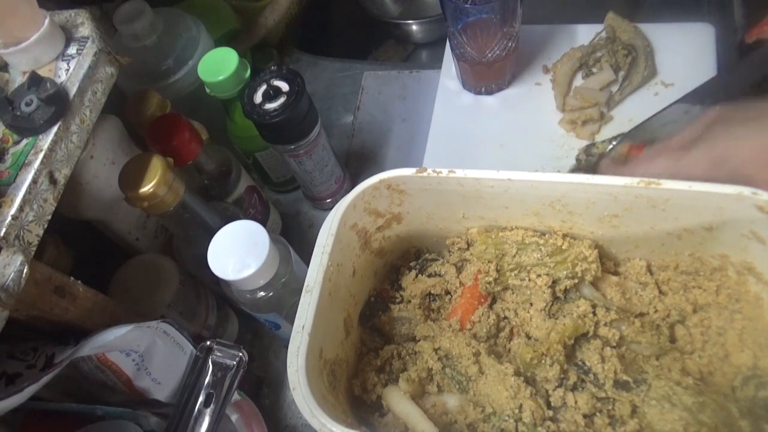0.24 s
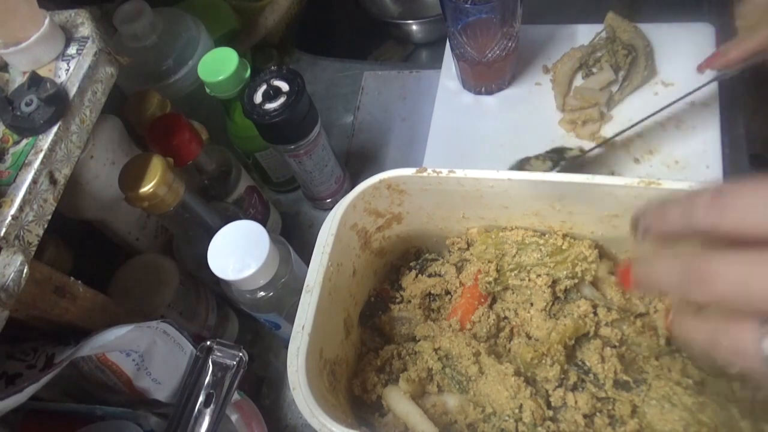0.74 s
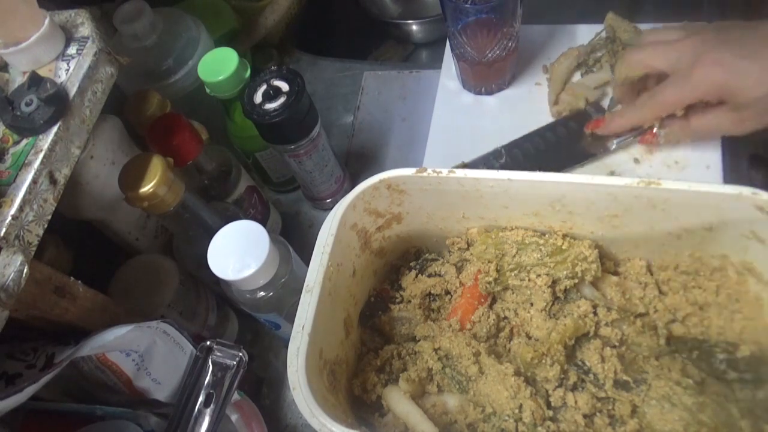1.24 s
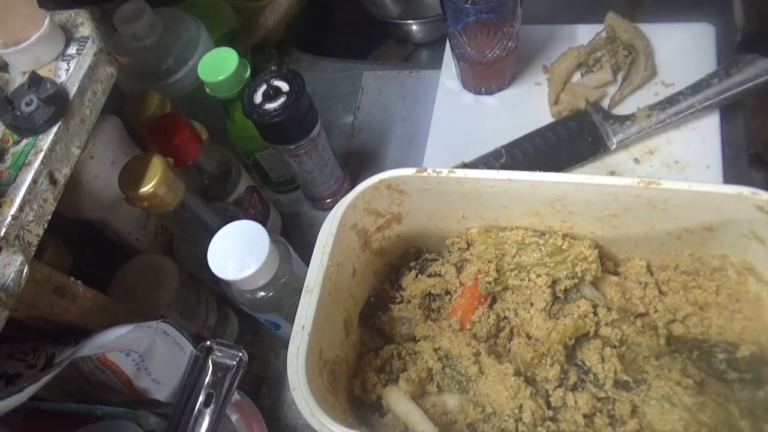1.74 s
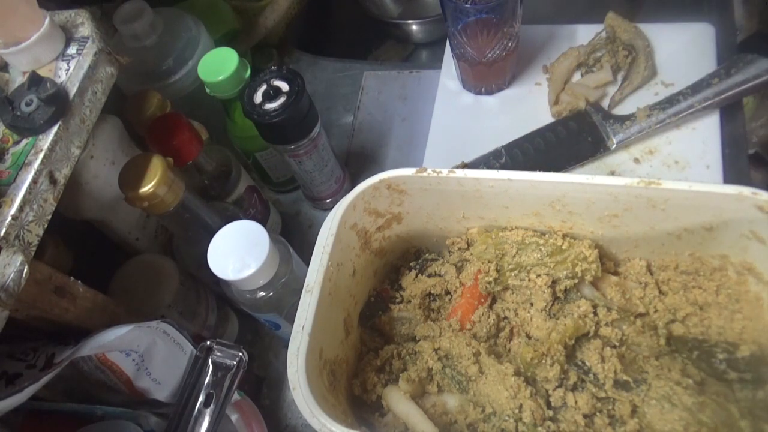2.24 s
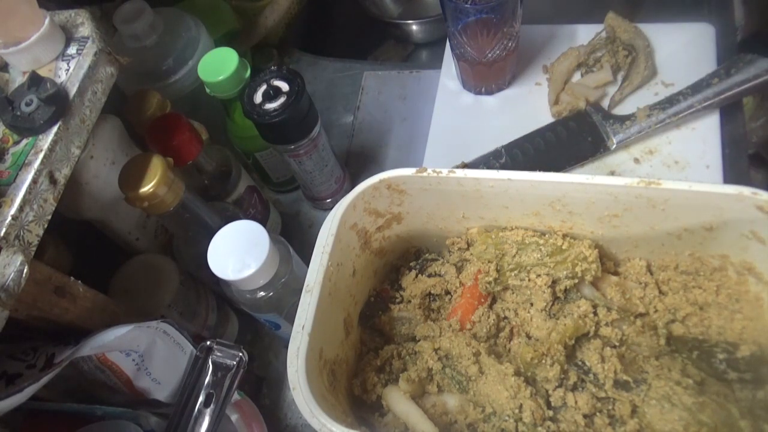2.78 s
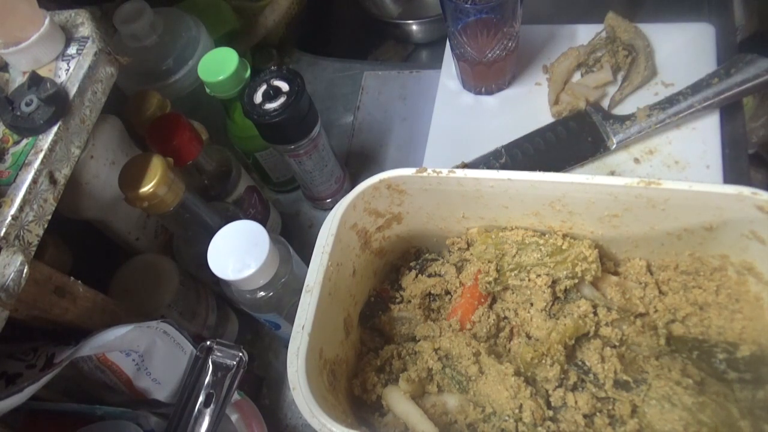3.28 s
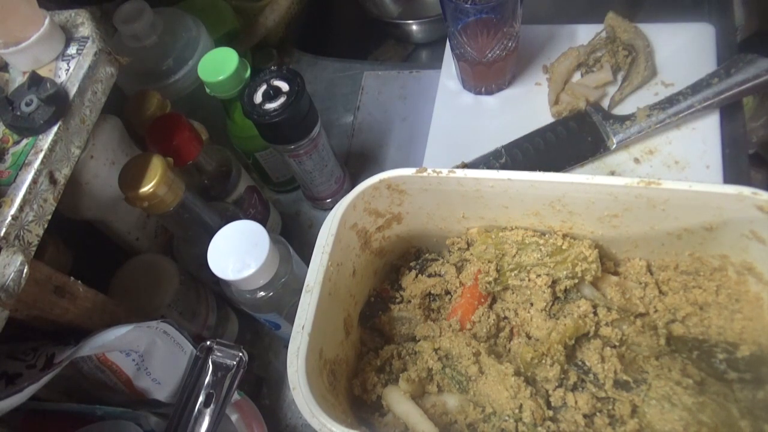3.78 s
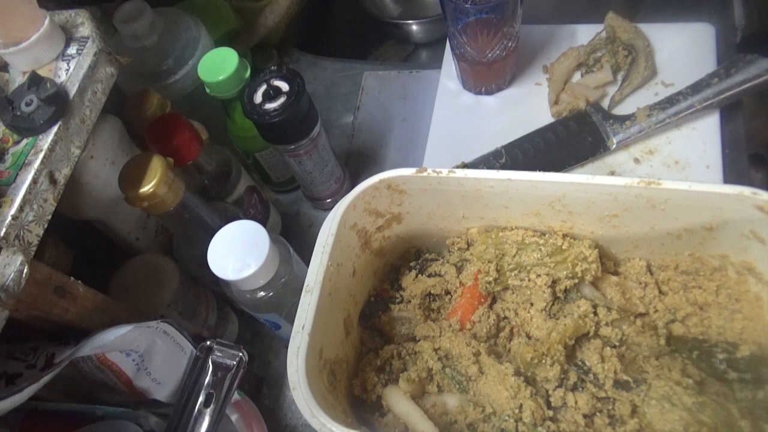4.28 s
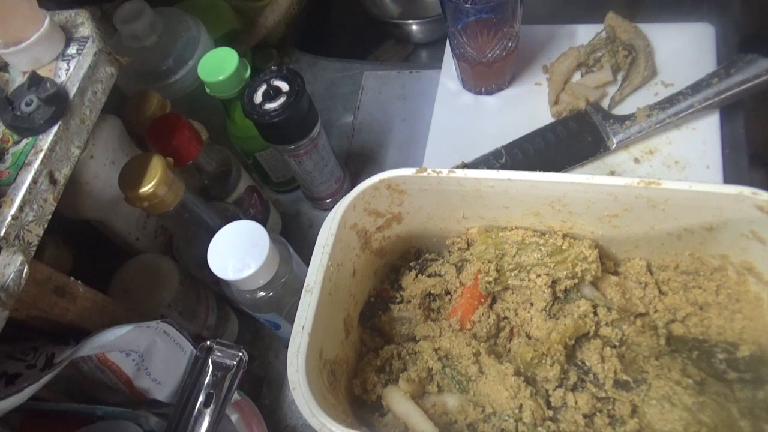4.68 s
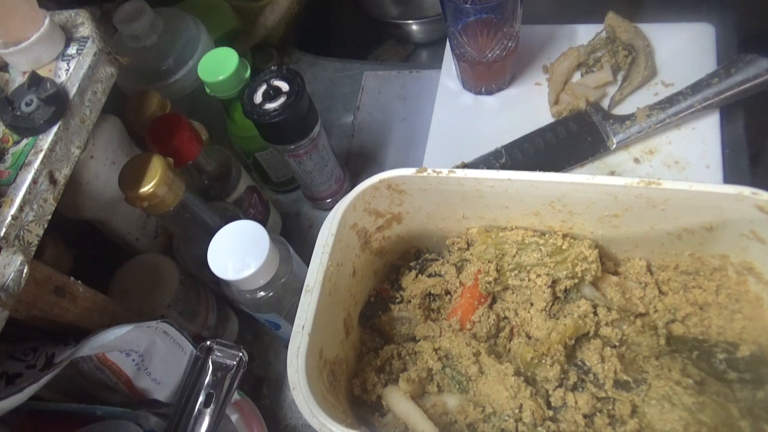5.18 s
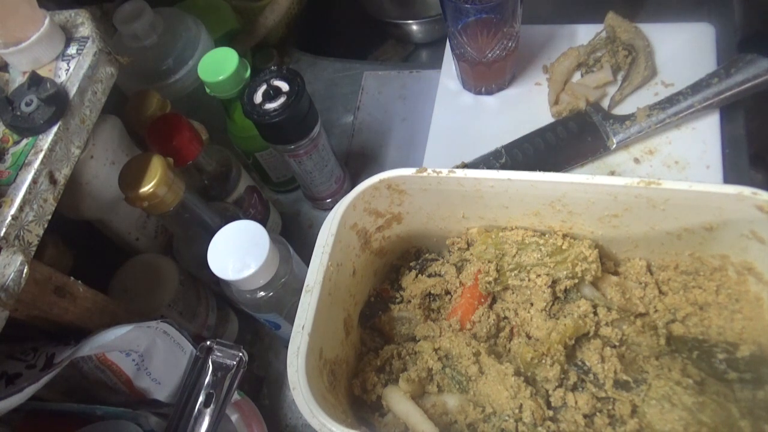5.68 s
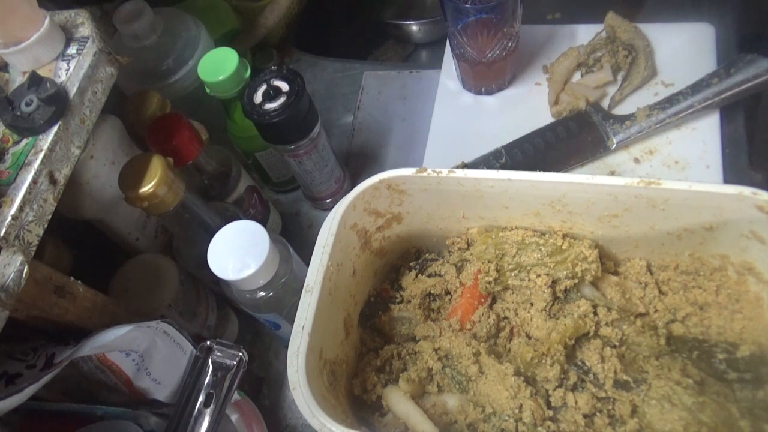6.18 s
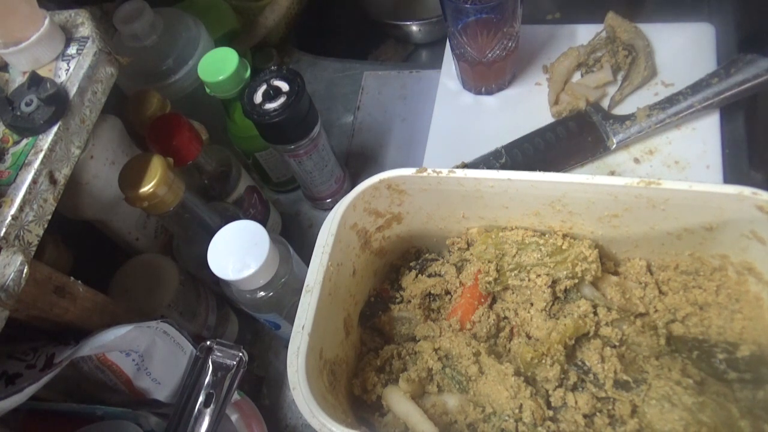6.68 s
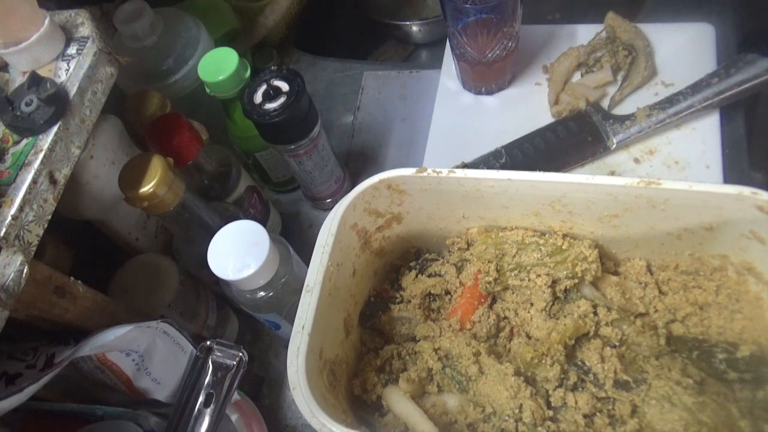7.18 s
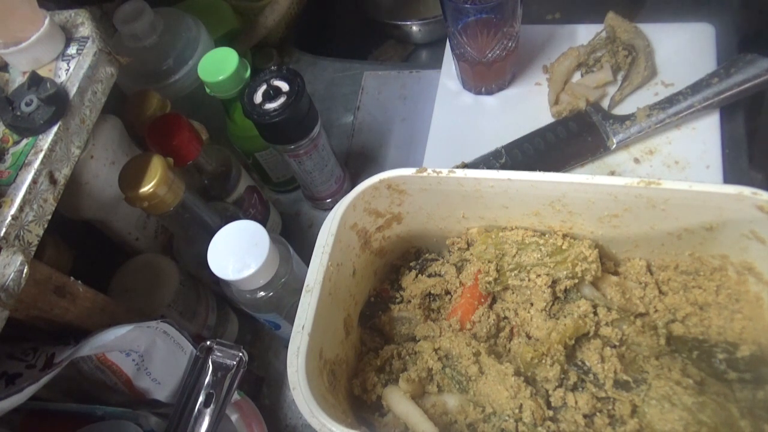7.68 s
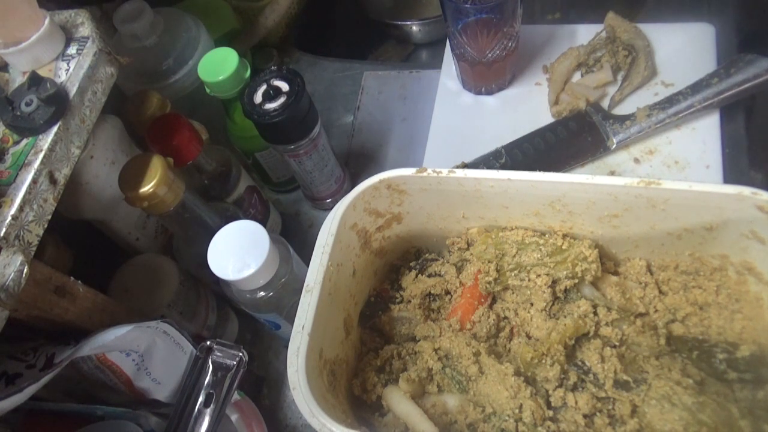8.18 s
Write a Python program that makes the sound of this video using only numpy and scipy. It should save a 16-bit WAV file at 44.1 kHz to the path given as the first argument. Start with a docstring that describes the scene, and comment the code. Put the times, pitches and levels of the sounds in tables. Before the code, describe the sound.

A low, soft room drone with faint hiss runs throughout. From 0 to 0.5 s a knife rubs and scratches gently on a plastic board; a faint knock comes at 0.64 s and a firmer one at 0.89 s. The blade slides with a thin metallic rasp and lands in a tight, hollow clack at 1.24 s, with a brief rattle by 1.3 s. Small rustles and dry ticks come around 1.8-2.2 s, then quiet. Crisp crackling returns from 3.1 s, peaks in a sharp rustle at 3.65 s and thins out to 4.5 s. At 4.9 s a tap erupts: rapid, harsh hissing spurts drum on the sink until 5.2 s, the loudest peaks flattened at the close microphone. Weaker spurts follow, with dull, sloshing bumps at 5.53-5.7 s. From there to 8.4 s a bright, broken spray splutters with quick high squirts, droplets and occasional bubble plips, growing slightly stronger at the end.

```python
"""A small kitchen with a low drone throughout: filtered noise rings a few soft room modes.
First a knife is laid on a plastic board, its blows and rubbing exciting board and blade modes, amid soft rustles of pops.
Then a tap opens with hard spurts: enveloped pops, coloured as hiss and splatter, drum on the sink and trail spray.
The stream builds up and splutters: squirts, droplets and bubbles are pops ringing pitched pockets of air,
with dull bumps on the sink. The close microphone clips the loudest peaks."""
import sys
import numpy as np
from scipy import signal
from scipy.fft import rfft, irfft
from scipy.io import wavfile

SR = 44100
rng = np.random.default_rng(int(sys.argv[2]) if len(sys.argv) > 2 else 0)


def wav_out(sig):
    """Save sig, one row per channel (or a flat mono array), as 16-bit PCM at SR to the path in sys.argv[1]."""
    wavfile.write(sys.argv[1], SR, np.round(np.clip(np.atleast_2d(sig).T, -1, 1) * 32767).astype(np.int16))


N = 371763
TIME = np.arange(N) / SR

# Levels in the tables are relative: each layer has its own gain on top.
# Low drone of the room. Each row: mode in Hz, level in dB, t60 in seconds.
DRONE_MODES = [(141.5, -0.5, 0.14), (232, -3, 0.14), (337.5, -5, 0.13), (693, -6, 0.064),
               (1685, -20.5, 0.035), (1927, -26, 0.049)]
# Spectrum of the room noise. Each row: frequency in Hz, density in dB per Hz.
ROOM_COLOUR = [(20, -38), (55, -18.5), (85, -6), (200, -12), (300, -13.5), (470, -11.5), (690, -11),
               (1000, -16.5), (1300, -24.5), (1650, -20.5), (2200, -24), (4200, -25), (6550, -16.5),
               (15500, -31.5)]
# Knife on the board. Each row: start in seconds, level in dB, click of the blade in dB over that level.
KNOCKS = [(0.639, -31.5, -7), (0.888, -23.5, -0.5), (1.2351, -21, 6.5), (1.240, -18, 4), (1.2448, -21, 5.5),
          (1.269, -34, -12)]
# Body of the board. Each row: mode in Hz, level in dB, t60 in seconds.
BOARD_MODES = [(153, -7, 0.3), (219, -1, 0.22), (267, 11.5, 0.16), (324, 11.5, .1), (367, -2, 0.14),
               (384, 8.5, 0.1), (463, -11, 0.46), (512, -2.5, 0.16), (620, 0, 0.076), (688, 0, 0.077),
               (752, 9, 0.066), (862, 3.5, 0.07), (960, 3, 0.05), (1040, -13, .05), (1590, -15, 0.086),
               (1680, -20, 0.05), (2000, -23, 0.044), (2420, -21, 0.076)]
# The blade slides over the board. Each row: time in seconds, level in dB.
SLIDE = [(.9, -80), (.94, -47), (1.02, -43), (1.08, -46), (1.13, -38), (1.2, -44), (1.235, -40),
         (1.26, -80)]
# Ringing of the blade. Each row: mode in Hz, level in dB, t60 in seconds.
BLADE_MODES = [(1610, -16, .1), (2245, -12, 0.086), (3984, -6, 0.053), (5717, -4, 0.037), (6255, 2, 0.044),
               (7000, -5, 0.017), (7400, -5, .012), (7940, -4, .025), (9458, 1, .03), (10266, -7, .025),
               (11600, -4, .025)]
# The knife rubs and rocks. Each row: peak time in seconds, level in dB, rise in seconds, fall in seconds.
RUBS = [(.06, -38.5, 0.31, 0.21), (.91, -39, .005, .08), (1.2, -39, 0.13, .03), (1.32, -33.5, 0.036, 0.025)]
# Spectrum of the blade's click. Each row: frequency in Hz, density in dB per Hz.
CLICK_COLOUR = [(50, -26), (250, 3), (800, 6.5), (1250, -10), (1700, -1), (3200, -12), (5000, -13.5),
                (7000, -6), (9000, -11), (15000, -26)]
# One rustle per movement. Each row: peak time in seconds, level in dB, rise in seconds, fall in seconds.
RUSTLES = [(.13, -31.5, 0.077, 0.054), (1.335, -32, 0.056, 0.027), (1.784, -26.5, 0.014, 0.02),
           (1.96, -39, 0.11, .06), (2.05, -30, 0.024, 0.031), (3.312, -25, 0.032, 0.09),
           (3.652, -12.5, 0.036, 0.038), (3.77, -21.5, 0.06, 0.053), (4.06, -36.5, 0.11, 0.11),
           (4.41, -36.5, 0.13, 0.16), (4.525, -28, 0.0077, 0.049), (4.87, -29.5, .012, 0.023)]
# Sharp crackles in the handling. Each row: start in seconds, level in dB, length in seconds.
CRACKLES = [(0.642, -35.5, 0.05), (1.772, -28, 0.016), (1.942, -26, 0.025), (2.039, -20, 0.014),
            (2.204, -32, 0.042), (3.147, -28, 0.023), (3.248, -26, .018), (3.436, -27, 0.019),
            (3.483, -16, 0.022), (3.515, -18.5, 0.017), (3.58, -20, 0.015), (3.83, -24, 0.016),
            (3.924, -25, 0.0078), (3.976, -23, 0.012), (4.106, -19.5, 0.012), (4.302, -26.5, 0.01),
            (4.502, -19.5, 0.018)]
# Spectrum of rustle and sliding. Each row: frequency in Hz, density in dB per Hz.
RUSTLE_COLOUR = [(200, -39), (330, 2), (600, -37), (1100, -17), (2200, -14), (3600, -10), (4700, -7.5),
                 (6400, 8), (7400, 5), (9000, -1.5), (13000, -3.5), (15800, -13.5)]
# Spurts, weaker towards the end as the air leaves the pipe. Each row: start in seconds, level in dB,
# length in seconds, low splatter in dB over that level, sink boom in dB over that level.
SPURTS = [(4.892, -13.5, 0.0098, -10, -4.5), (4.899, -8.5, 0.018, -33, -14),
          (4.918, -12, 0.042, -2.5, -7.5), (4.965, -31, 0.052, 2, 0), (5.019, -14, 0.01, -7, -13),
          (5.037, -7, 0.035, -15, -16.5), (5.069, -12.5, 0.03, -7.5, -12), (5.097, -5.5, 0.018, -18, -22),
          (5.132, -7, 0.025, -11, -23), (5.16, -21.5, 0.021, 0.5, -11), (5.181, -13, 0.024, -8, -11),
          (5.219, -15.5, 0.022, -20, -13), (5.378, -24.5, 0.051, -1, -20), (5.473, -21, 0.06, -10, -26),
          (5.557, -17, 0.077, -9.5, -26)]
# Spectra of spurts, spray and splatter. Each row: frequency in Hz, density in dB per Hz.
SPURT_COLOUR = [(1470, -44), (2500, -14.5), (3650, -12.5), (3940, -14), (4320, -7.5), (4820, -7), (6660, 0),
                (9000, -7), (12600, -9), (15800, -22)]
SPRAY_COLOUR = [(2000, -15.5), (3500, -11), (4500, -7), (5400, -6.5), (6300, 2.5), (7200, 0), (8800, -6.5),
                (11000, -3), (13000, -8.5), (15800, -17.5)]
SPLATTER_COLOUR = [(60, -84), (200, -3), (450, 2), (900, 2), (1400, 0.5), (2000, -1.5), (3000, 0.5),
                   (4500, -6.5), (7000, -3)]
# Body of the sink. Each row: mode in Hz, level in dB, t60 in seconds.
SINK_MODES = [(99, -6, 0.13), (145, -13, .12), (220, -14, 0.12), (261, 10, 0.11), (315.5, -1.5, 0.3),
              (363, -4.5, 0.11), (406, 1, 0.15), (510, -19, 0.04), (595, -33, 0.056), (708, -10.5, 0.13),
              (860, -27, 0.11), (1010, -23, 0.037)]
# Steady running. Each row: time in seconds, spray level in dB, splatter in the basin in dB.
FLOW = [(5.25, -21, -37), (5.43, -22.5, -32.5), (5.57, -32, -35.5), (5.82, -24.5, -40.5),
        (5.96, -23.5, -40.5), (6.23, -26, -38), (6.35, -25.5, -40), (6.59, -24, -41.5), (7.03, -23, -38),
        (7.19, -23, -38.5), (7.49, -26, -40), (7.74, -25.5, -42), (8.25, -19.5, -39), (8.43, -19.5, -37)]
# The loudest squirts. Each row: start in seconds, level in dB, nominal pitch in Hz (tuned up a little
# when played), width in Hz, length in seconds.
SQUIRTS = [(5.272, -15, 7840, 1300, 0.014), (5.315, -10, 8160, 6100, 0.012),
           (5.374, -15.5, 7600, 2470, 0.019), (5.799, -17, 9250, 6700, .018),
           (5.851, -9, 8350, 5300, 0.0081), (5.927, -20, 7600, 3800, .014),
           (5.975, -12.5, 7500, 1790, 0.023), (6.14, -18.5, 8050, 4600, .022),
           (6.209, -12.5, 10100, 3200, .011), (6.231, -16.5, 6100, 1640, 0.015),
           (6.264, -17.5, 6900, 2410, 0.019), (6.34, -14, 5750, 3360, 0.0088),
           (6.373, -13, 9200, 4700, 0.012), (6.521, -24, 8340, 6300, 0.0077),
           (6.596, -18, 8800, 4400, .021), (6.67, -17, 8200, 5400, 0.023),
           (6.783, -12.5, 7150, 2600, 0.006), (6.803, -21.5, 6800, 2000, 0.037),
           (6.947, -9.5, 9000, 2100, 0.011), (6.974, -10, 7230, 1600, 0.019),
           (7.156, -18.5, 6700, 1400, 0.044), (7.203, -16.5, 6940, 1500, 0.025),
           (7.221, -12, 5300, 3860, .013), (7.379, -20.5, 10300, 5100, 0.031),
           (7.496, -19, 7760, 6300, 0.023), (7.536, -12, 5500, 2006, 0.011),
           (7.729, -18.5, 6000, 2890, 0.02), (7.751, -8.5, 7100, 1900, 0.015),
           (7.895, -15, 8600, 4500, 0.0074), (7.949, -15.5, 9900, 6350, 0.017),
           (7.974, -14, 6470, 2400, 0.012), (8.047, -15.5, 8900, 5650, 0.029),
           (8.25, -10.5, 9900, 3500, 0.011), (8.32, -12.5, 8500, 3100, 0.011),
           (8.345, -24.5, 6930, 2200, 0.051), (8.408, -18, 7140, 3400, 0.02)]
# Dull bumps against the sink. Each row: start in seconds, level in dB, pitch of the slosh in Hz.
BUMPS = [(5.534, -26.5, 200), (5.583, -22, 220), (5.603, -28, 350), (5.63, -22, 131), (5.64, -19, 223),
         (5.651, -20.5, 110), (5.671, -15.5, 151), (5.699, -20.5, 380), (6.233, -19.5, 520)]
# The loudest bubbles. Each row: start in seconds, level in dB, pitch in Hz.
BUBBLES = [(5.572, -22.5, 3180), (5.587, -22, 3200), (6.919, -22.5, 2340), (6.921, -30.5, 1410),
           (7.025, -28.5, 1730), (7.179, -23.5, 2390), (7.19, -19.5, 2930), (7.75, -17.5, 4800),
           (7.84, -20.5, 4800), (8.105, -20, 4820), (8.154, -21, 4320), (8.27, -22, 2800)]

ROOM_DB, DRONE_DB = -43, -44
SCRAPE_DB, SCRAPE_HZ, SCRAPE_WIDTH_HZ = -8, 2030, 3500  # the edge scratches the board in the first rub
MIST_DB, MIST_S = -4.5, 0.034  # spray that trails each spurt: its share and its decay
OPEN_S, FILL_S = 5.05, 0.31  # the stream sets in after the first spurts; time for it to build up
BREAKUP_DB, BREAKUP_HZ = 2, 30.23  # the stream necks and swells, so its spray comes in clumps
# weaker squirts: typical gap, level over the spray, and random spread of the level
SPUTTER_GAP_S, SPUTTER_DB, SPUTTER_SCATTER_DB = .04, 1, 0.7
# their typical nominal pitch, its spread, and typical width and length
SPUTTER_HZ, SPUTTER_OCTAVES, SPUTTER_WIDTH_HZ, SPUTTER_S = 7220, 0.2, 3300, .012
CLEAR_S = .03  # no weak squirt falls this close to a loud one
# small bubbles form once water has pooled: earliest time, middle level, pitch range
POOL_S, SMALL_BUBBLE_DB, SMALL_BUBBLE_HZ = 6.3, -31.5, (1980, 4700)
KITCHEN_T60_S, KITCHEN_DB = 0.18, -10
TOP_HZ = 15900


def undb(db):
    """Decibels to gain."""
    return 10 ** (np.asarray(db) / 20)


def unit(x):
    """Scale to rms 1."""
    return x / np.sqrt(np.mean(x ** 2) + 1e-18)


def highpass(x, order, hz):
    """Thin out the sound below a frequency."""
    return signal.sosfilt(signal.butter(order, hz, "high", fs=SR, output="sos"), x)


def curve(rows):
    """Gain from dB over time; silent outside the table."""
    seconds, db = np.transpose(rows)
    return undb(np.interp(TIME, seconds, db, left=-np.inf, right=-np.inf))


def swells(rows):
    """Gain of movements that each grow to a peak and die away; their powers add."""
    power = np.zeros(N)
    for s, db, rise, fall in rows:
        distance = np.maximum((s - TIME) / rise, (TIME - s) / fall)
        power += (undb(db) * np.exp(-distance)) ** 2
    return np.sqrt(power)


def burst(length, attack=0.00048, steep=1.4, size=5000):
    """Envelope that opens fast, holds for about its length and collapses."""
    t = TIME[:size]
    return (1 - np.exp(-t / attack)) * np.exp(-(t / max(length, .002)) ** steep)


def walk(rate):
    """Slow chance with a spread near 1."""
    return np.interp(TIME * rate, np.arange(N // 100), rng.standard_normal(N // 100))


def patter(rate, spread_db, size=N):
    """Tiny impacts at random times (rate per second), most weak and a few strong; rms 1."""
    chance, strength, sign = rng.random(size), rng.exponential(size=size), rng.standard_normal(size)
    hits = chance < rate / SR
    return unit(hits * np.sign(sign) * undb(spread_db * np.minimum(strength, 4)))


def add(track, s, sound):
    """Mix a sound in at a time."""
    i = max(int(s * SR), 0)
    track[i:i + len(sound)] += sound[:max(N - i, 0)]


def ring(x, response):
    """Pass a sound through an impulse response."""
    return signal.fftconvolve(x, response)[:len(x)]


def colour(points, size=1024):
    """Causal minimum-phase response of unit energy with the given spectrum."""
    hz, db = np.transpose(points)
    bins_hz = np.arange(size // 2 + 1) * SR / size
    log_gain = np.log(undb(np.interp(np.log(bins_hz + 1), np.log(hz), db)))
    # folding the cepstrum forward in time makes the response causal
    cepstrum = irfft(log_gain)
    cepstrum[1:size // 2] *= 2
    cepstrum[size // 2 + 1:] = 0
    return unit(irfft(np.exp(rfft(cepstrum)))) / np.sqrt(size)


def modes(table):
    """Response of unit energy of a body with decaying modes; neighbours swing in opposite phase."""
    t = TIME[:SR // 2]
    response = np.zeros(len(t))
    for k, (hz, db, t60) in enumerate(table):
        decay = np.exp(-np.log(1000) * t / t60)
        response += (-1) ** k * undb(db) * np.sin(2 * np.pi * hz * t) * decay
    # a small body radiates almost nothing below its lowest mode
    response = highpass(response, 3, 0.55 * table[0][0])
    return response / np.linalg.norm(response)


def pocket(pops, hz, width, glide=0):
    """Pops ring a pocket of air whose pitch glides (share per s) as it changes size; their energy is kept."""
    t = TIME[:len(pops)]
    turn = np.exp(2j * np.pi * np.cumsum(hz * np.exp(glide * t)) / SR)
    pole = np.exp(-np.pi * width / SR)
    # resonate around zero frequency, then shift up to the gliding pitch
    out = (turn * signal.lfilter([1], [1, -2 * pole, pole ** 2], pops / turn)).real
    return out * np.linalg.norm(pops) / (np.linalg.norm(out) + 1e-12)


def background():
    """Room noise, barely wavering, with a low drone of noise through resonant modes and a thin hiss."""
    noise = ring(rng.standard_normal(N), colour(ROOM_COLOUR, size=8192))
    drone = ring(rng.standard_normal(N), modes(DRONE_MODES))
    return undb(.5 * walk(5.18)) * (undb(ROOM_DB) * noise + undb(DRONE_DB) * drone)


def knife():
    """Blows and friction ring the board; the sliding blade sings faintly and the handle rattles last."""
    blows, clicks = np.zeros((2, N))
    for s, db, click_db in KNOCKS:
        add(blows, s, undb([db]))
        click = burst(0.0064, attack=0.00036, steep=0.73) * patter(8100, 5.4, size=5000)
        add(clicks, s, undb(db + click_db) * click)
    knocks = undb(29.5) * ring(blows, modes(BOARD_MODES)) + ring(clicks, colour(CLICK_COLOUR))

    friction = patter(4000, 3)
    # the changing pressure of the fingers bends the blade's pitch
    bend = np.cumsum(.012 * walk(14)) / SR
    song = np.interp(TIME + bend, TIME, ring(friction, modes(BLADE_MODES)))
    rasp = ring(friction, colour(RUSTLE_COLOUR))
    slide = curve(SLIDE) * (undb(-0.5 + 2 * walk(45.1)) * song + rasp) / np.sqrt(2)

    rocking = swells(RUBS) * ring(patter(2000, 1.5), modes(BOARD_MODES[2:]))
    rattle = undb(1.5) * swells(RUBS[-1:]) * pocket(patter(1500, 2), 480, 170)
    scrape = undb(SCRAPE_DB) * swells(RUBS[:1]) * pocket(friction, SCRAPE_HZ, SCRAPE_WIDTH_HZ)
    return knocks + slide + rocking + rattle + scrape


def handling():
    """Dense tiny pops under fluttering swells make fine rustling; short bursts add sharper crackles."""
    flutter = undb(2.2 * np.minimum(walk(60), 1.2))
    envelope = undb(-0.5) * swells(RUSTLES) * flutter
    for s, db, length in CRACKLES:
        add(envelope, s, undb(db - 5.5) * burst(length))
    return ring(envelope * patter(12000, 2.8), colour(RUSTLE_COLOUR))


def spurts():
    """Air in the pipe throws the first water out in slugs that splatter, drum on the sink and trail spray."""
    hiss, splatter, boom, mist = np.zeros((4, N))
    for s, db, length, splatter_db, boom_db in SPURTS:
        slug = undb(db) * burst(length, attack=0.0015, steep=6.3)
        add(hiss, s, slug)
        add(splatter, s, slug * undb(splatter_db))
        add(boom, s, slug * undb(boom_db))
        add(mist, s, undb(db + MIST_DB) * burst(MIST_S, attack=0.0031, steep=1.4))
    jet = ring(hiss * undb(2 * walk(400)) * patter(7000, 1.7), colour(SPURT_COLOUR))
    splash = ring(splatter * patter(5400, 2.7), colour(SPLATTER_COLOUR))
    drum = ring(boom * patter(3000, 1.6), modes(SINK_MODES[2:]))
    spray = ring(mist * patter(6000, 1.8), colour(SPRAY_COLOUR))
    drips = undb(-9) * ring(mist * patter(2600, 1.9), colour(SPLATTER_COLOUR))
    return jet + splash + drum + spray + drips


def flow(axis):
    """Gain of the stream: it builds up when the tap opens, then follows a column of the flow."""
    rows = np.array(FLOW)
    build_up = np.clip((TIME - OPEN_S) / FILL_S, 0, 1)
    return build_up * undb(np.interp(TIME, rows[:, 0], rows[:, axis]))


def droplets(low_hz, high_hz, spread_db, life_s, width_share, count, size=1400):
    """Droplets of many sizes, each a short cluster of pops at its own pitch; rms 1 while the tap runs."""
    out = np.zeros(N)
    clusters = patter(4500, 2.5, size=count * size).reshape(count, size)
    for (when, pitch, strength, life, bend), pops in zip(rng.random((count, 5)), clusters):
        hz = low_hz + (high_hz - low_hz) * pitch
        gain = undb(spread_db * min(-np.log(1 - strength), np.e))
        cluster = pops * burst(life_s * (.5 + life), attack=0.00011, steep=0.54, size=size)
        # the pitch may glide either way
        sound = pocket(cluster, hz, width_share * hz, glide=20 * (bend - .5))
        add(out, OPEN_S + when * (TIME[-1] - OPEN_S), gain * sound)
    return out / np.std(out[TIME > OPEN_S])


def stream():
    """The broken stream: fine spray and lone ticks above, droplets splattering in the basin below."""
    clumps = undb(BREAKUP_DB * walk(BREAKUP_HZ))
    fine = droplets(4260, 14960, spread_db=5.0, life_s=0.0046, width_share=.22, count=1900)
    ticks = undb(-8.5) * patter(120, 1.6)
    spray = clumps * flow(axis=1) * ring(fine + ticks, colour(SPRAY_COLOUR))
    coarse = undb(-11.0) * droplets(826, 4810, spread_db=2, life_s=0.0071, width_share=0.13, count=420)
    wash = undb(2.6 * walk(90)) * patter(2500, 2.4)
    # the splatter follows the clumps only half as deeply in dB
    splatter = np.sqrt(clumps) * flow(axis=2) * ring(coarse + wash, colour(SPLATTER_COLOUR))
    return undb(-3.5) * spray + undb(4) * splatter


def sputter(count=120):
    """Weak squirts at uneven gaps between the loud ones, following the flow; rows like those of SQUIRTS."""
    flow_s, spray_db, _ = np.transpose(FLOW)
    gap, strength, pitch, width, length = rng.standard_normal((count, 5)).T
    times = flow_s[0] + np.cumsum(SPUTTER_GAP_S * np.exp(.35 * gap))
    db = np.interp(times, flow_s, spray_db) + SPUTTER_DB + SPUTTER_SCATTER_DB * strength
    hz = SPUTTER_HZ * 2 ** (SPUTTER_OCTAVES * pitch)
    width_hz = SPUTTER_WIDTH_HZ * np.exp(0.37 * width)
    length_s = SPUTTER_S * np.exp(0.24 * length)
    loud_s = np.array(SQUIRTS)[:, 0]
    return [row for row in zip(times, db, hz, width_hz, length_s)
            if row[0] < TIME[-1] and np.abs(loud_s - row[0]).min() > CLEAR_S]


def squirts():
    """Each squirt is a quick train of pops that ring one swelling pocket of air, with some spray around it."""
    pockets, spray = np.zeros((2, N))
    for s, db, hz, width, length in list(SQUIRTS) + sputter():
        envelope = undb(db) * burst(length, attack=.0005, steep=1.4)
        pops = envelope * patter(5500, 2.9, size=5000)
        # hold the energy to that of the envelope, however the pops fall
        pops *= np.linalg.norm(envelope) / (np.linalg.norm(pops) + 1e-9)
        add(pockets, s, pocket(pops, 1.073 * hz, width, glide=-5.5))
        add(spray, s, pops)
    return pockets + undb(-10) * ring(spray, colour(SPRAY_COLOUR))


def bumps():
    """Soft blows make the sink modes boom, and low pops slosh dully with each."""
    blows, slosh = np.zeros((2, N))
    for s, db, hz in BUMPS:
        add(blows, s, undb([db]))
        pops = undb(db) * burst(0.033, attack=0.003, steep=0.99) * patter(2800, 1.2, size=5000)
        add(slosh, s, pocket(pops, hz, hz))
    return undb(26.5) * ring(blows, modes(SINK_MODES)) + undb(-7.5) * highpass(slosh, 3, 80)


def small_bubbles(count=18):
    """Bubbles of any size at random times in the pooled water; rows like those of BUBBLES."""
    low_hz, high_hz = SMALL_BUBBLE_HZ
    rows = []
    for when, strength, pitch in rng.random((count, 3)):
        s = POOL_S + when * (TIME[-1] - POOL_S)
        rows.append((s, SMALL_BUBBLE_DB + 7 * (strength - .5), low_hz + pitch * (high_hz - low_hz)))
    return rows


def bubbles():
    """Bubbles burst with a short, rough plip: pops ringing a narrow pocket of air."""
    out = np.zeros(N)
    for s, db, hz in list(BUBBLES) + small_bubbles():
        pops = undb(db) * burst(0.01, steep=0.98) * patter(2500, 2.8, size=5000)
        add(out, s, pocket(pops, hz, 0.19 * hz))
    return undb(-1.0) * out


def kitchen(x):
    """The short tail of a small room: decaying noise mixed under the direct sound."""
    t = TIME[:SR // 2]
    tail = rng.standard_normal(len(t)) * np.exp(-np.log(1000) * t / KITCHEN_T60_S) * (t > .002)
    # small hard surfaces scatter the treble; long waves pass them by
    echoes = highpass(tail / np.linalg.norm(tail), 2, 600)
    return undb(-1.0) * (x + undb(KITCHEN_DB) * ring(x, echoes))


def scene():
    """Knife, handling and water share the one small room, over its background."""
    water = spurts() + stream() + squirts() + bumps() + bubbles()
    return (background() + kitchen(knife() + handling() + water))[None]


def record(dry):
    """The microphone flattens the loudest peaks; the deepest bass and the top are cut."""
    thinned = highpass(np.clip(dry, -1, 1), 2, 45)
    return signal.sosfilt(signal.ellip(10, .2, 70, TOP_HZ, fs=SR, output="sos"), thinned)


dry = scene()
out = record(dry)
wav_out(out)
```